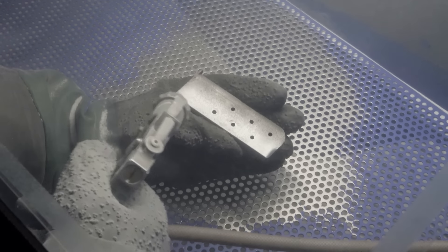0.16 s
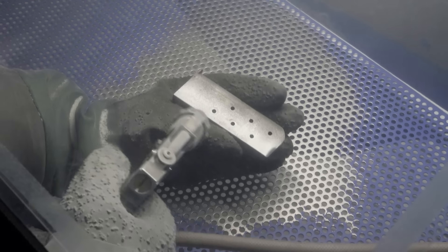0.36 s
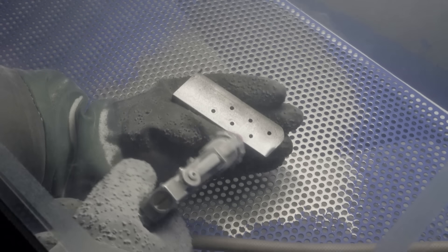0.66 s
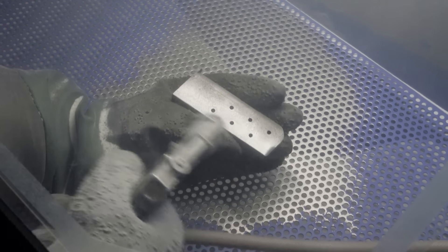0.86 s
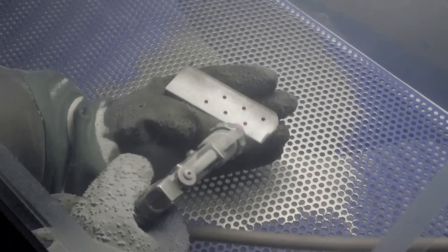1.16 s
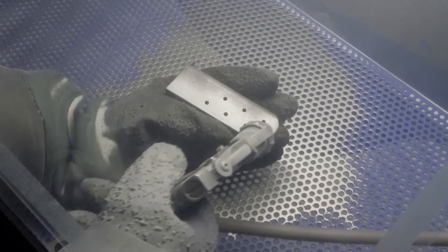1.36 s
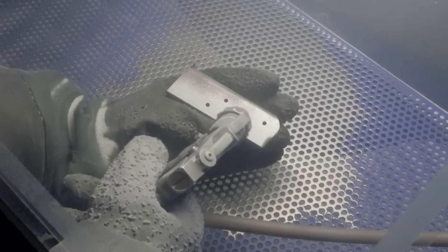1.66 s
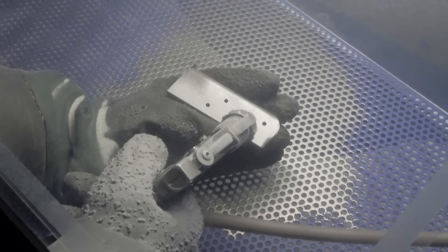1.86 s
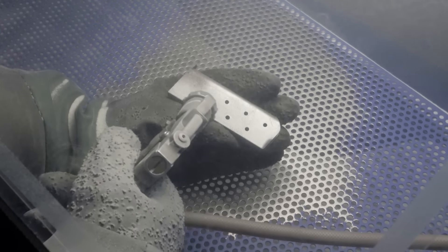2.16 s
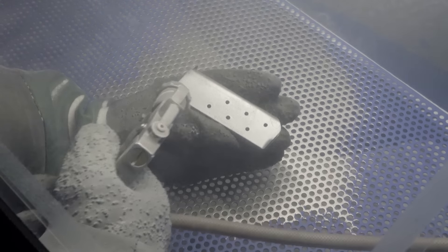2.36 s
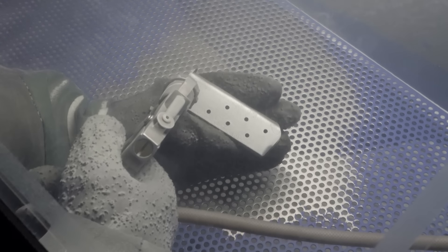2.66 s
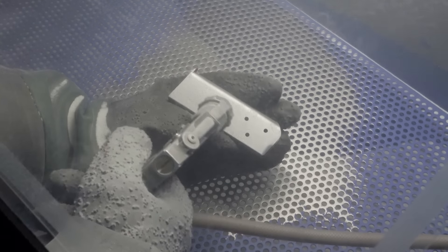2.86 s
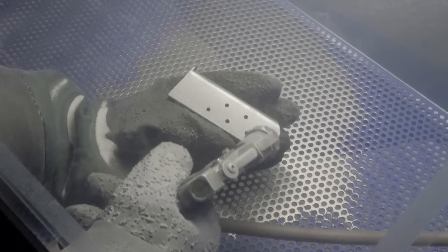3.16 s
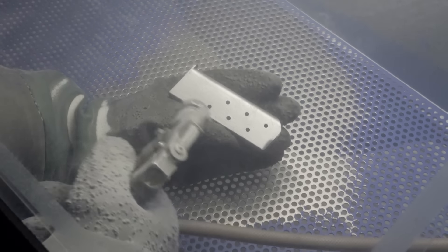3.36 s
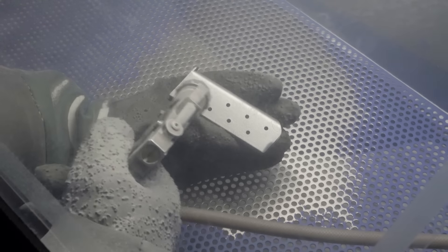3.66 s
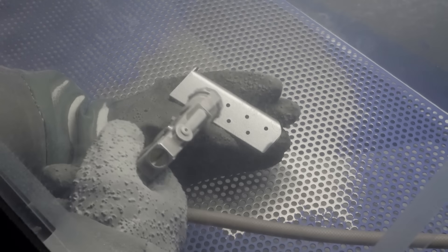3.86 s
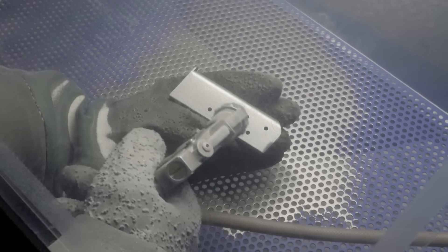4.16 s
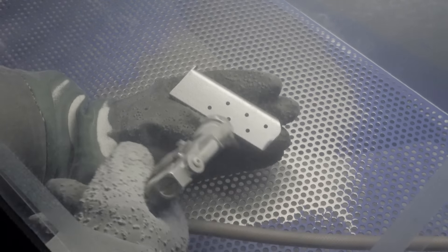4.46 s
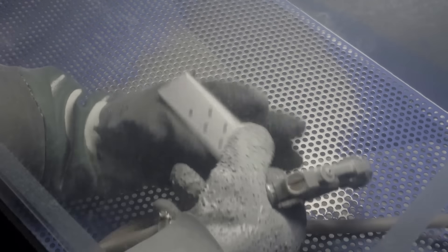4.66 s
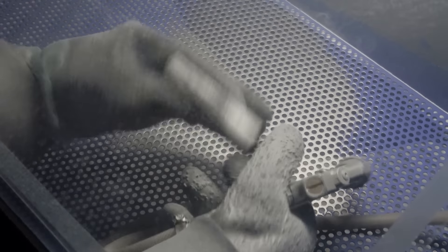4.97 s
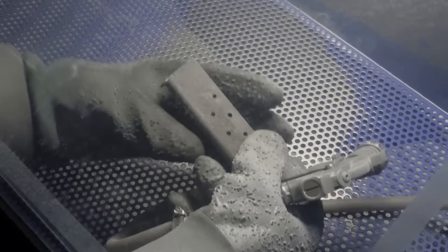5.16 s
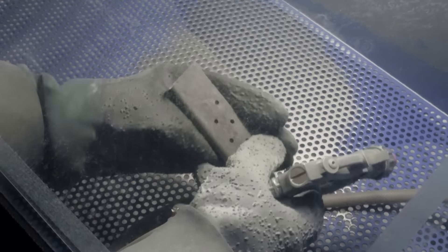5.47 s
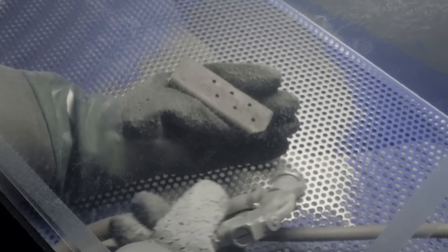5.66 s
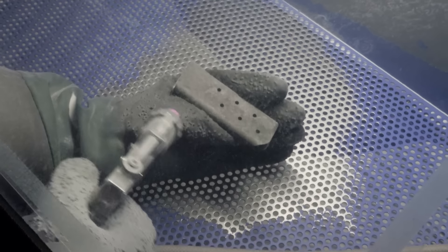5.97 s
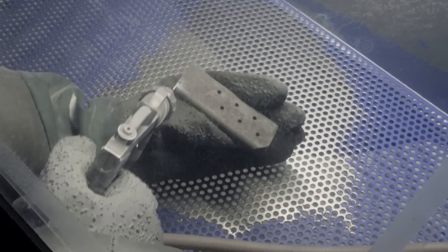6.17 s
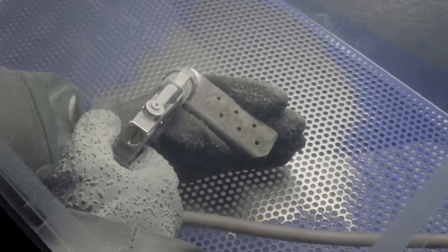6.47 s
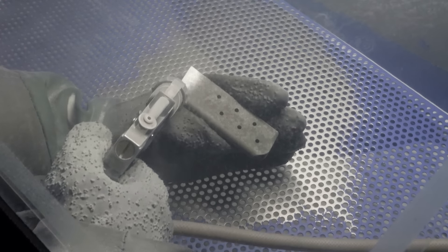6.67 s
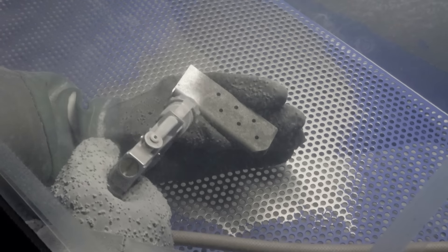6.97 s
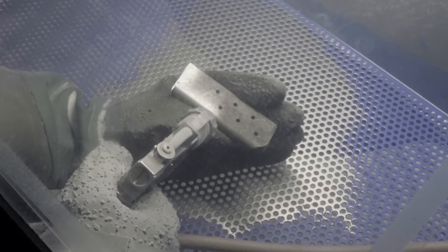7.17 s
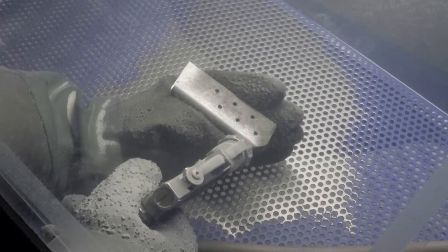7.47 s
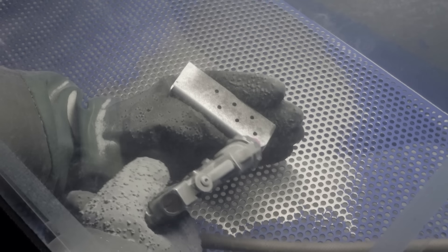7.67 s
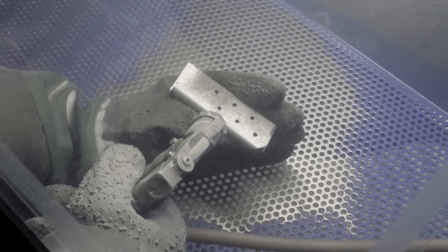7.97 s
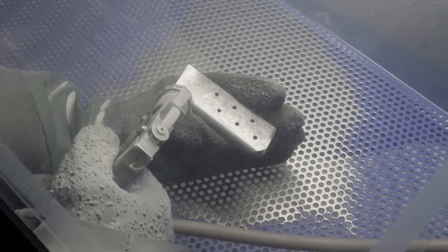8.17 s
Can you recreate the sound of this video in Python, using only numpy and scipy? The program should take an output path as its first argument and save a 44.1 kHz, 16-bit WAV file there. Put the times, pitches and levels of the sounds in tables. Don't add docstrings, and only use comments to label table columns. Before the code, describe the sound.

Pressurised glass beads hiss without pause against steel, coloured by the resonant metal box, their treble softening briefly as the nozzle turns. A fan whines steadily. After an early sudden pitch jump, a distant piston compressor starts with a low groan and metallic ring, drags the fan down, then buzzes to the end. Mostly centred, with the microphone close by in a small workshop.

```python
import sys
import numpy as np
from scipy import signal
from scipy.fft import rfft, irfft
from scipy.io import wavfile
from scipy.ndimage import uniform_filter1d

SR = 44100
rng = np.random.default_rng(int(sys.argv[2]) if len(sys.argv) > 2 else 0)


def decibels_to_gain(level_db):
    exponent = np.asarray(level_db, float) / 20
    return 10 ** exponent


def pcm_store(signal):
    levels = np.round(np.clip(np.atleast_2d(signal), -1, 1) * 32767)
    wavfile.write(sys.argv[1], SR, levels.astype(np.int16).T)


N = 366912
T = np.arange(N) / SR
HZ = np.fft.rfftfreq(N, 1 / SR) + 1e-3
FAST_FROM_S, SPEED_UP = 0.638, 1.591
STROKE_HZ = 82.647


def level(x, db):
    return x * decibels_to_gain(db) / np.sqrt(np.mean(x ** 2))


def colour_db(table, hz):
    f, db = np.transpose(table)
    return np.interp(np.log(hz), np.log(f), db)


def noise(gain):
    return irfft(rfft(rng.standard_normal(N)) * gain, N)


def resonances(table, hz, order):
    return sum(decibels_to_gain(db) ** 2 / (1 + (2 * (hz - f) / width) ** 2) ** order for f, width, db in table)


def cabinet(speed, ripple_db):
    # pitch_hz, level_db
    hiss = [(60, -58), (95, -54), (150, -49), (300, -34), (600, -20), (760, -8), (1250, -11), (2700, -9),
            (5150, -11), (8500, -10), (10800, -11), (15600, -9), (20000, -9), (25500, -8)]
    # pitch_hz, width_hz, level_db
    cavity = [(840, 70, 4), (1000, 120, -2), (1650, 180, -7), (1820, 200, -3), (2160, 160, -14),
              (2390, 280, -4), (2790, 80, -7), (3190, 400, -7), (3780, 170, -6), (4020, 360, -7),
              (4400, 300, 1), (4750, 470, -6), (5520, 210, -2), (5860, 620, -9), (6460, 340, 0),
              (6960, 530, -9), (7360, 200, -4), (7860, 100, -8), (8170, 80, -6), (9300, 480, -4),
              (10110, 490, -7), (11400, 260, -6), (12050, 830, -10), (12590, 500, -8), (13560, 930, -8),
              (14080, 150, -7), (15050, 540, -6), (17130, 470, -13), (18590, 50, -30), (21180, 1500, -8)]
    hz = HZ / speed
    power = decibels_to_gain(colour_db(hiss, hz)) ** 2 + resonances(cavity, hz, 2)
    ripple = decibels_to_gain(np.interp(hz / 45, np.arange(len(ripple_db)), ripple_db))
    return np.sqrt(power) * ripple


def blast(spread, slow_spread):
    # middle_s, length_s, treble_db
    turns_away = [
        (.66, .2, -2.5),
        (1.2, 0.11, -3),
        (1.9, 0.11, -2),
        (2.45, 0.36, -2.5),
        (3.9, 0.46, -1),
    ]
    slow_blast_db, blast_db, ricochet_db = -34, -36.5, 1.1
    surge_db, surge_s = 1.3, 0.87
    treble_db = ricochet_db + sum(db * np.exp(-((T - s) / length) ** 2) for s, length, db in turns_away)
    ripple_db = np.clip(np.arange(800) / 50, 0, 1) * 1.6 * rng.standard_normal(800)
    fast = cabinet(0.99, ripple_db) * spread
    slow = cabinet(1 / SPEED_UP, ripple_db) * slow_spread

    treble = np.exp(-(np.log(HZ / 11000) / 0.14) ** 2)
    steady = noise(fast * np.sqrt(1 - treble))
    ricochets = noise(fast * np.sqrt(treble)) * decibels_to_gain(treble_db)
    pressure = decibels_to_gain(blast_db + surge_db * np.exp(-T / surge_s))
    slow = slow * decibels_to_gain(0.87 * np.exp(-(np.log(HZ / 3200) / 0.25) ** 2))
    switch = np.clip((T - FAST_FROM_S) / 0.002, 0, 1)
    return noise(slow) * decibels_to_gain(slow_blast_db) * (1 - switch) + (steady + ricochets) * pressure * switch


def extractor():
    # time_s, pitch_hz, level_db
    fan_sag = [
        (0, 1910.7, -53.5),
        (4.08, 1908.5, -53),
        (4.15, 1850, -64),
        (4.21, 1810, -50),
        (4.28, 1799, -57),
        (4.38, 1858, -62),
        (4.5, 1886, -61),
        (4.7, 1891, -60),
        (8.32, 1881, -60),
    ]
    # multiple, level_db
    fan_orders = [(.045, -106), (.109, -98), (2, -64), (3, -67), (4, -72)]
    # from_s, to_s, level_db
    seventh_spells = [
        (0, 1.3, -59),
        (4.16, 4.42, -59),
        (4.75, 6, -61.5),
        (7.9, 8.4, -61.5),
    ]
    slow_fan_db, loaded_second_db = 1.4, -71
    rest_db, fade_s = -69, 0.2

    s, blade_hz, db = np.transpose(fan_sag)
    slow = T < FAST_FROM_S
    spells_db = []
    for from_s, to_s, top_db in seventh_spells:
        presence = np.clip(1 + np.minimum(T - from_s, to_s - T) / fade_s, 0, 1)
        spells_db.append((top_db - rest_db) * presence)
    seventh_db = rest_db + np.max(spells_db, axis=0)

    waver = uniform_filter1d(rng.standard_normal((2, N)), size=3000)
    waver = level(uniform_filter1d(waver, size=3000), 0)
    hz = np.interp(T, s, blade_hz) * np.where(slow, 1 / SPEED_UP, 1)
    turn = 2 * np.pi * np.cumsum(hz * (1 + 0.0004 * waver[0])) / SR
    others = sum(decibels_to_gain(order_db) * np.sin(k * turn + k) for k, order_db in fan_orders)
    others += decibels_to_gain(loaded_second_db) * (T > fan_sag[2][0]) * np.sin(2 * turn + 2)
    seventh = decibels_to_gain(seventh_db + 1.5 * waver[1]) * np.sin(7 * turn)
    blade_db = np.interp(T, s, db) + slow_fan_db * slow + 0.4 * waver[1]
    blade = decibels_to_gain(blade_db) * np.sin(turn)
    return np.sqrt(2) * (blade + seventh + others)


def strain():
    from_s, rise_s, to_s, fall_db_per_s = 4.1, 0.034, 4.355, 300
    housing = sum(1 / (1 + (2 * (HZ - hz) / 170) ** 2) for hz in (985, 1250, 1480, 1720))
    rise = 1 - np.exp(-np.maximum(T - from_s, 0) / rise_s)
    fall = decibels_to_gain(-fall_db_per_s * np.maximum(T - to_s, 0))
    return level(noise(housing), -48.5) * rise * fall


def groan():
    # start_s, pitch_hz, t60_s, level_db
    shudders = [
        (4.112, 239, .15, -63),
        (4.124, 328, 0.29, -64),
        (4.134, 236, 0.1, -51),
        (4.146, 443, .15, -59),
        (4.16, 222, 0.083, -56),
        (4.184, 260, 0.11, -61),
        (4.202, 1730, 0.13, -36),
    ]
    out = np.zeros(N)
    for s, hz, t60, db in shudders:
        age = np.maximum(T - s, 0)
        envelope = decibels_to_gain(db - 60 * age / t60) * (1 - np.exp(-age / 0.0034))
        out += envelope * np.sin(2 * np.pi * hz * age)
    return out


def stroke_response(size=4096):
    # pitch_hz, line_rms_db
    stroke_body = [(83, -117), (165, -77), (260, -74), (400, -64), (1000, -72), (3400, -70), (4500, -85),
                   (6400, -81)]
    # pitch_hz, width_hz, level_db
    body_ringing = [(330, 30, -61), (655, 35, -61), (795, 65, -54), (910, 30, -55), (1240, 150, -56),
                    (1490, 30, -55), (1720, 190, -53), (1955, 50, -53), (2260, 205, -58), (2485, 30, -64),
                    (2610, 85, -60), (2850, 110, -55), (3010, 55, -49),
                    (3550, 165, -64), (3805, 30, -61), (3985, 110, -60), (4250, 75, -57), (4420, 60, -59),
             (4745, 55, -53), (4910, 90, -61), (5130, 30, -72), (5340, 145, -66), (5605, 45, -63),
             (5915, 290, -63), (6175, 120, -66)]
    # pitch_hz, level_db
    valve = [(6400, -73), (7800, -77), (8350, -69), (8800, -78), (9900, -74), (10700, -77), (11200, -71),
             (11500, -77), (12050, -70), (12400, -68), (13000, -78), (16000, -79)]

    multiple = np.fft.rfftfreq(size, 1 / SR) / STROKE_HZ
    lines = np.arange(1, SR / 2 / STROKE_HZ)
    hz = lines * STROKE_HZ
    rings = resonances(body_ringing, hz, 2)
    casting = np.sqrt(decibels_to_gain(colour_db(stroke_body, hz)) ** 2 + rings) * np.minimum(lines / 2, 1) ** 2
    ragged = decibels_to_gain(colour_db(valve, hz) + 3 * rng.standard_normal(len(lines)))
    line_gain = np.where(hz < valve[0][0], casting, ragged)
    gain = np.exp(np.interp(multiple, lines, np.log(line_gain)))
    smear_depth = np.interp(multiple, [8, 13, 22, 28], [1.2, 0.75, 0.7, 1.8])
    smear = smear_depth * np.interp(multiple, np.arange(300), rng.standard_normal(300))
    spike = np.roll(irfft(gain * np.exp(1j * smear)), size // 4)
    return -spike * SR / STROKE_HZ / np.sqrt(2)


def compressor():
    # pitch_hz, level_db
    intake = [(60, -51), (200, -20), (300, -16), (600, -9.5), (800, 0.5), (1100, 3), (2200, 0), (3000, 4),
              (4500, 1), (8000, 0), (12000, -2), (16000, -1.5)]
    first_stroke_s, full_speed_s, steady_from_s = 4.21, 4.335, 4.3975
    spin_up_hz_per_s, slip_hz, settle_s = 378, 1.5, 0.045
    stroke_db, stroke_db_per_octave, thump_power = 0.74, 3.5, 2.1

    slip = slip_hz * np.exp(-np.maximum(T - full_speed_s, 0) / settle_s)
    rate = np.clip(STROKE_HZ - spin_up_hz_per_s * (full_speed_s - T), 1e-3, STROKE_HZ - slip)
    turns = np.cumsum(rate) / SR
    turns -= turns[-1] - (T[-1] - steady_from_s) * STROKE_HZ
    first_turn = np.ceil(np.interp(first_stroke_s, T, turns))
    start = np.interp(np.arange(first_turn, turns[-40]), turns, T)
    chance = rng.standard_normal((len(start), 2))
    at = (start + 2e-6 * chance[:, 0]) * SR
    octaves = np.log2(np.interp(start, T, rate) / STROKE_HZ)
    size = decibels_to_gain(stroke_db_per_octave * octaves + 0.35 * chance[:, 1])

    taps = at.astype(int)[:, None] + np.arange(-8, 9)
    offset = taps - at[:, None]
    pulses = np.zeros(N + 9)
    np.add.at(pulses, taps, size[:, None] * np.sinc(offset) * np.cos(np.pi * offset / 18) ** 2)
    strokes = signal.fftconvolve(pulses, stroke_response())[1024:N + 1024]
    thump = irfft(rfft(strokes) / (1 + (HZ / 700) ** 4), N)
    strokes = decibels_to_gain(stroke_db) * (strokes - thump * (1 - (rate / STROKE_HZ) ** thump_power))

    puff_decay = np.exp(-T[:SR // 10] / 0.047)
    puffs = signal.fftconvolve(np.bincount(at.astype(int), size, N), puff_decay)[:N]
    air = level(noise(decibels_to_gain(colour_db(intake, HZ))) * puffs, -52)
    return strokes + air


def motor():
    # pitch_hz, level_db
    whine = [(243, -83), (304, -83), (345, -86), (366, -82), (471, -83), (853, -63), (1279, -70),
             (1704, -67), (2700, -62), (3112, -67)]
    speed = np.interp(T, [4.25, 4.42], [0.8, 1])
    wobble = level(uniform_filter1d(rng.standard_normal(N), size=4000), -63)
    turn = 2 * np.pi * np.cumsum(speed + wobble) / SR
    lines = sum(decibels_to_gain(db) * np.sin(hz * turn) for hz, db in whine)
    return np.sqrt(2) * lines * np.interp(T, [4.3, 4.45], [0, 1])


def scene():
    # pitch_hz, side_minus_mid_db
    port_width = [(60, -34), (1300, -31), (2400, -20.5), (3300, -16), (4500, -15), (5000, -15), (6300, -14),
                  (7600, -18), (9000, -14), (11000, -13.5), (14500, -12.5), (16000, -16), (25500, -8)]
    machine = compressor() + motor() + strain()
    mid = blast(1, 1) + extractor() + machine + groan()
    width = decibels_to_gain(colour_db(port_width, HZ))
    slow_width = decibels_to_gain(colour_db(port_width, HZ * SPEED_UP))
    walls = np.exp(2j * np.pi * np.interp(HZ / 60, np.arange(400), rng.random(400)))
    far_side = irfft(rfft(machine) * walls * np.minimum(HZ / 2000, 1), N) * decibels_to_gain(-17.5)
    tilt = np.interp(T, [0, 0.6, 0.7, 4, 4.6], [-0.08, -0.05, -0.03, -0.025, 0.07])
    side = blast(width, slow_width) + far_side + tilt * irfft(rfft(mid) * HZ / 12000, N)
    return np.array([mid + side, mid - side])


def low_pass(x):
    return signal.sosfilt(signal.butter(12, 17010, fs=SR, output="sos"), x)


def record(dry):
    passband = (HZ < 15735) / np.sqrt(1 + (85 / HZ) ** 2)
    return low_pass(irfft(rfft(dry) * passband, N))


dry = scene()
out = record(dry)
pcm_store(out)
```